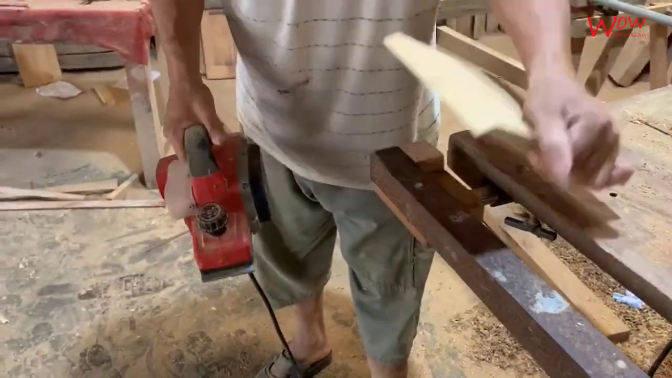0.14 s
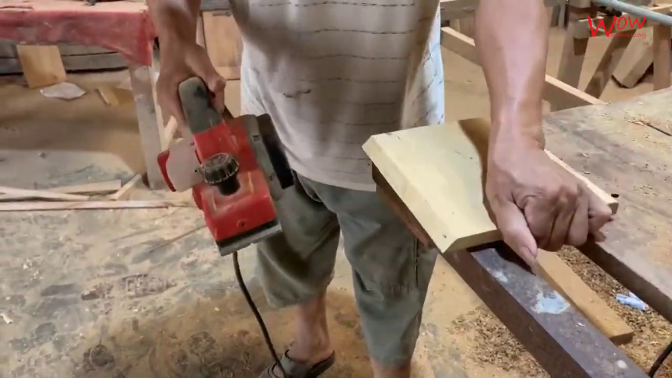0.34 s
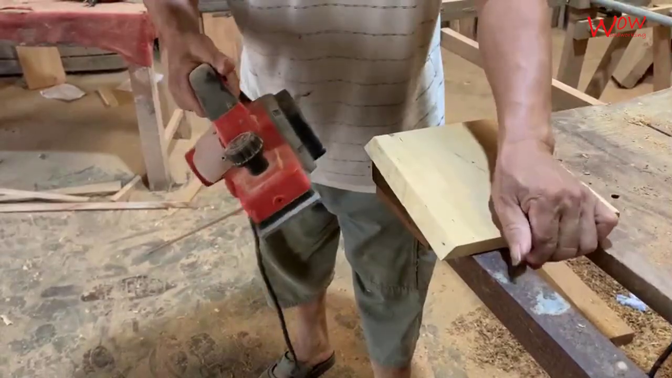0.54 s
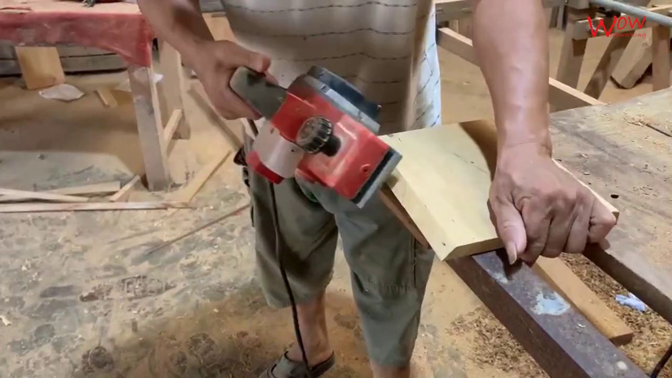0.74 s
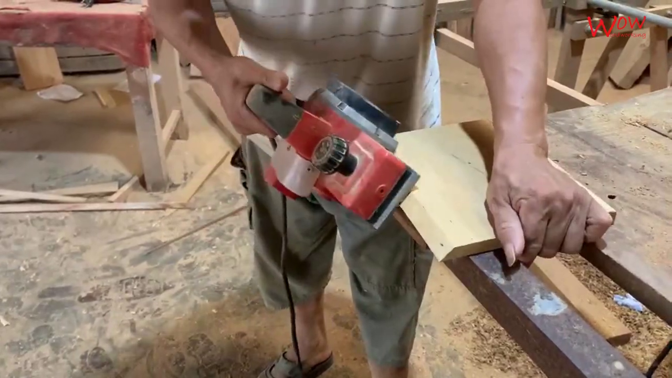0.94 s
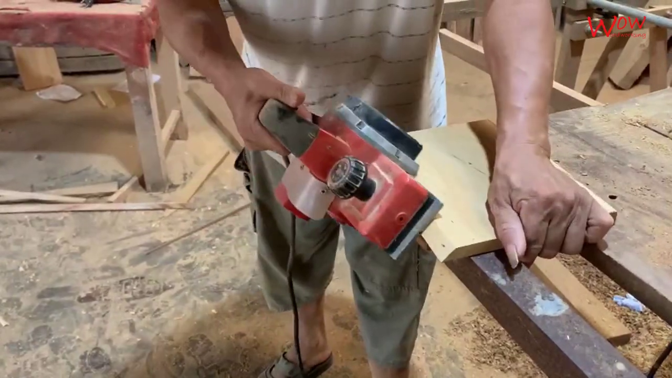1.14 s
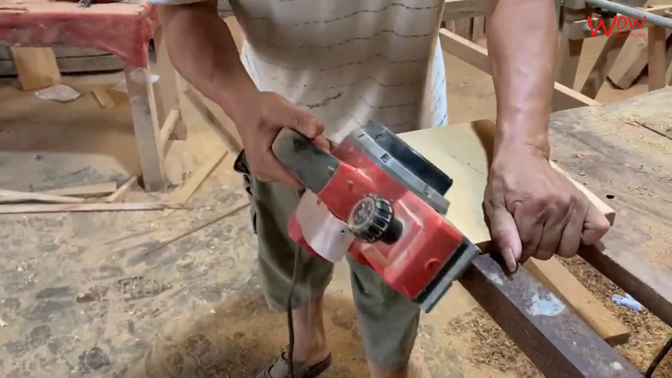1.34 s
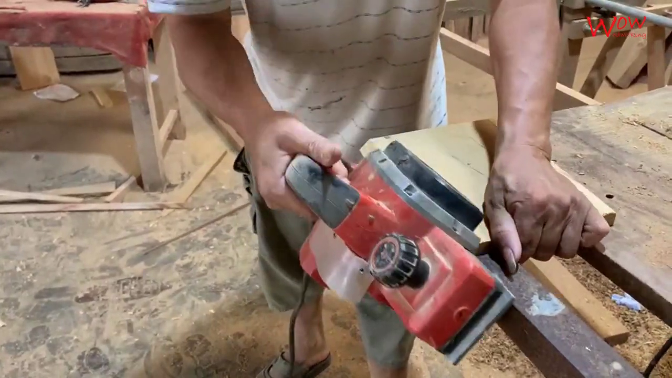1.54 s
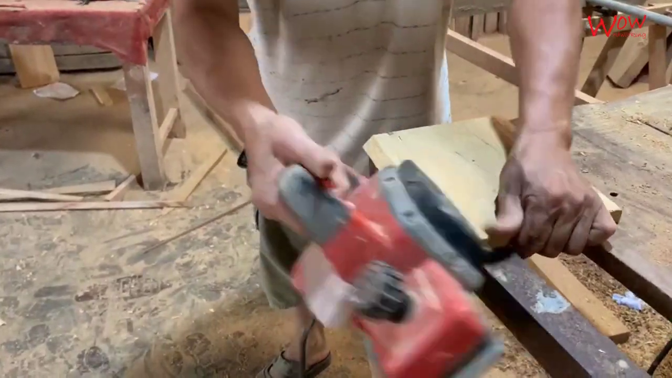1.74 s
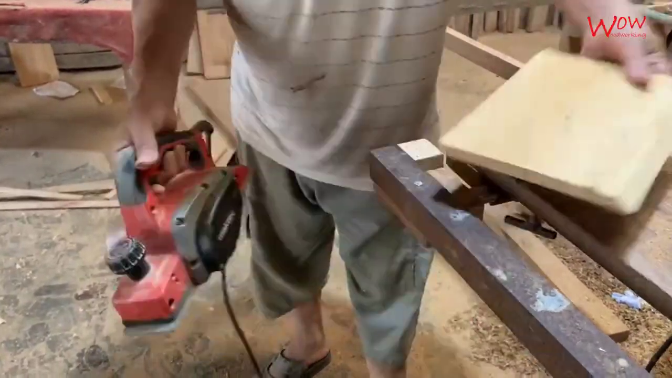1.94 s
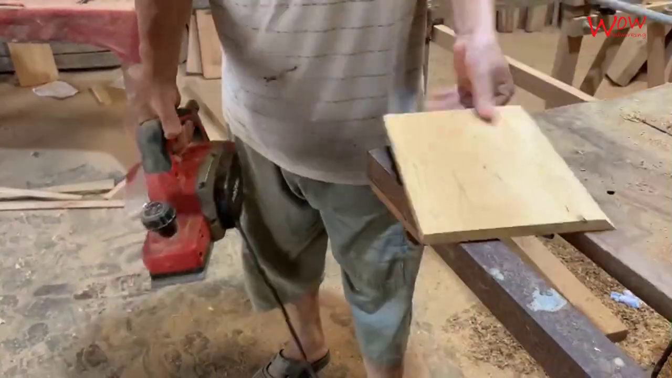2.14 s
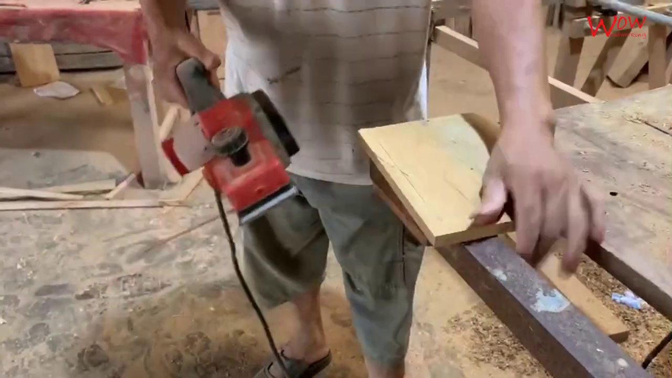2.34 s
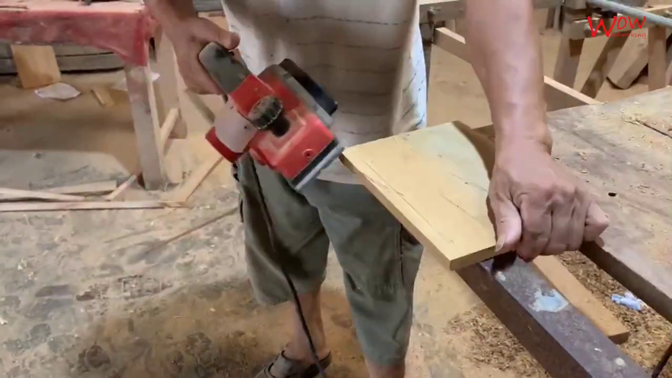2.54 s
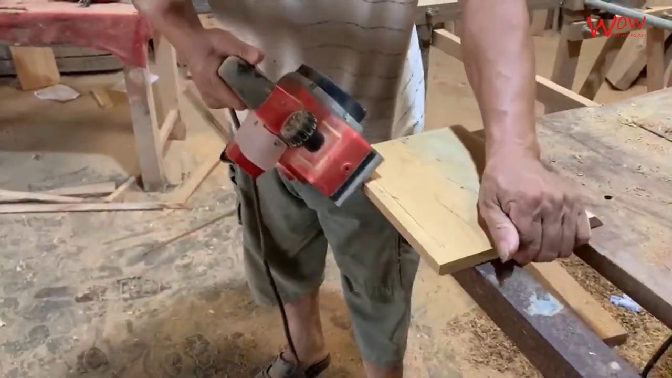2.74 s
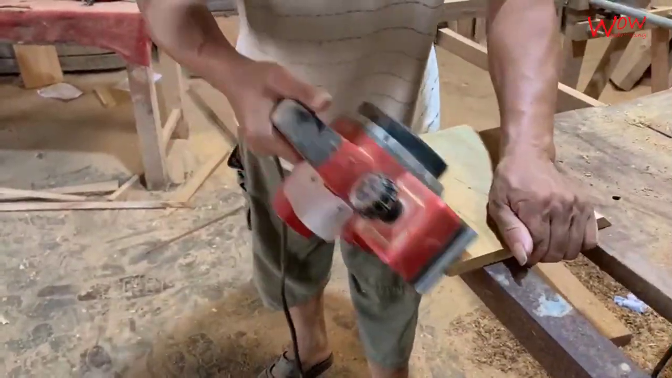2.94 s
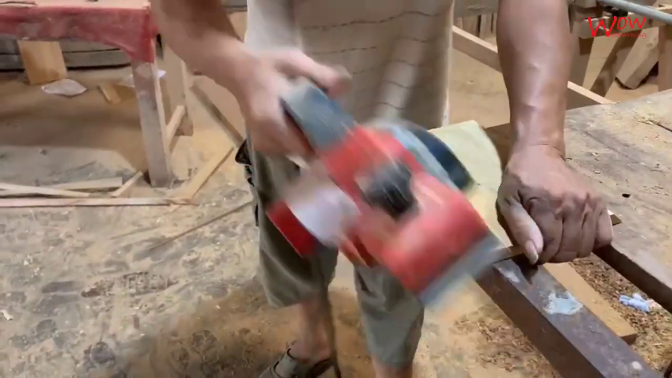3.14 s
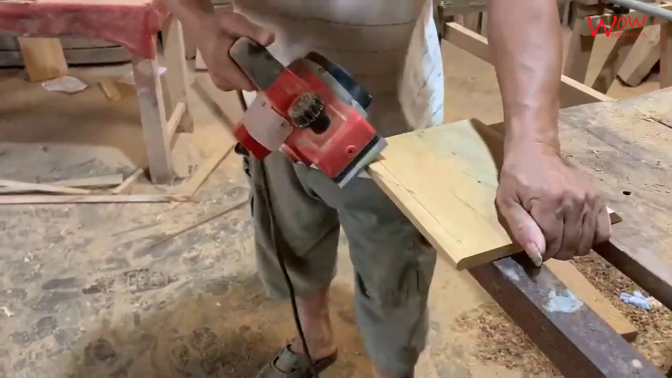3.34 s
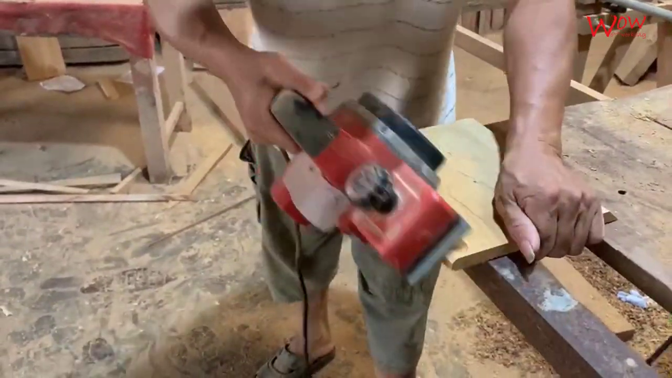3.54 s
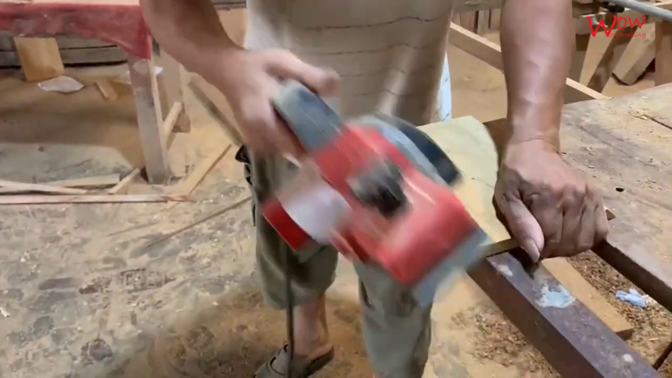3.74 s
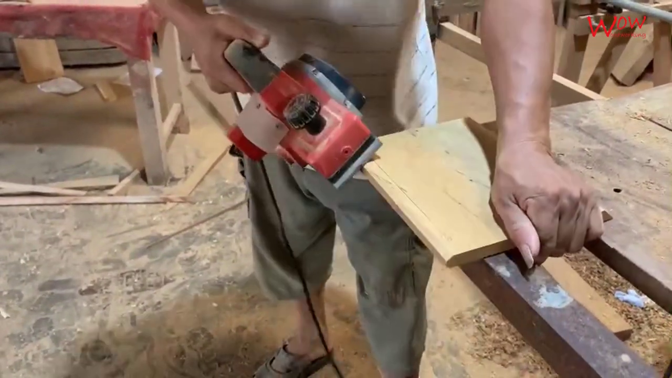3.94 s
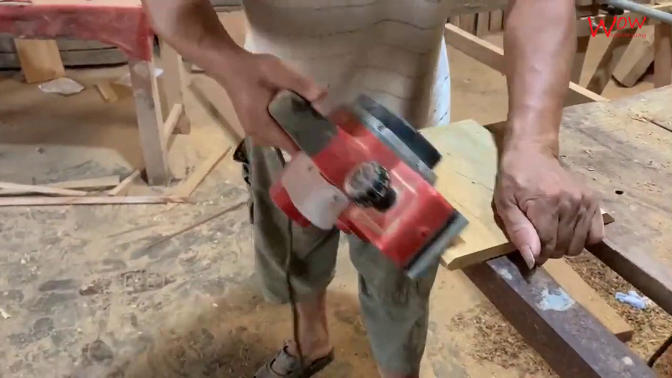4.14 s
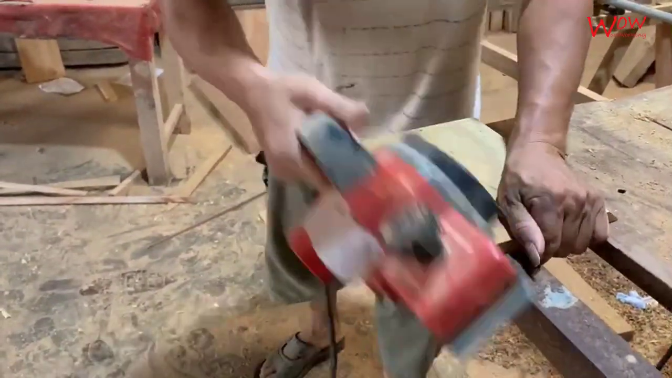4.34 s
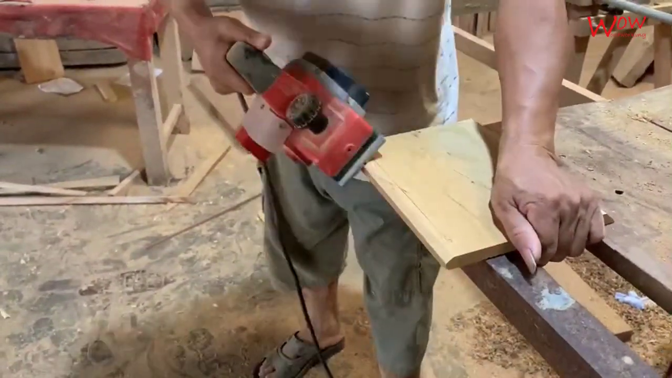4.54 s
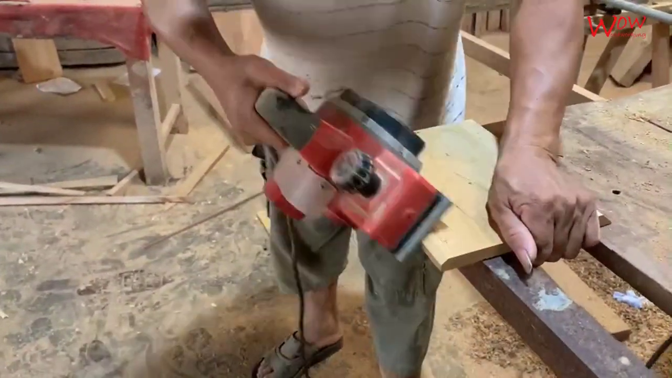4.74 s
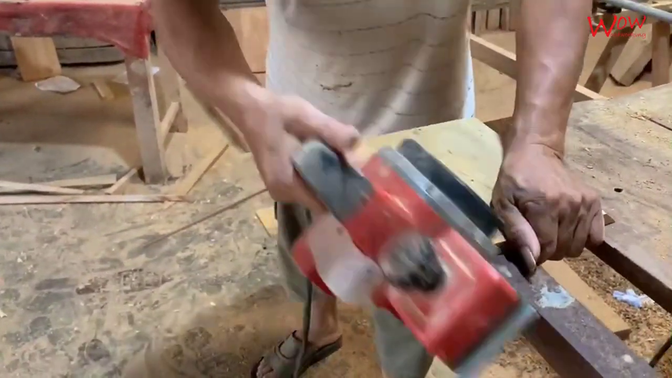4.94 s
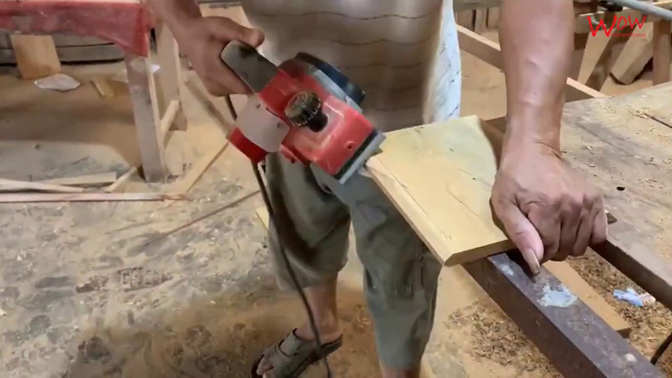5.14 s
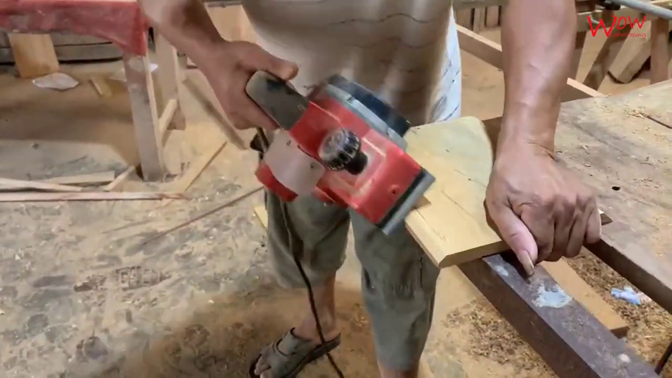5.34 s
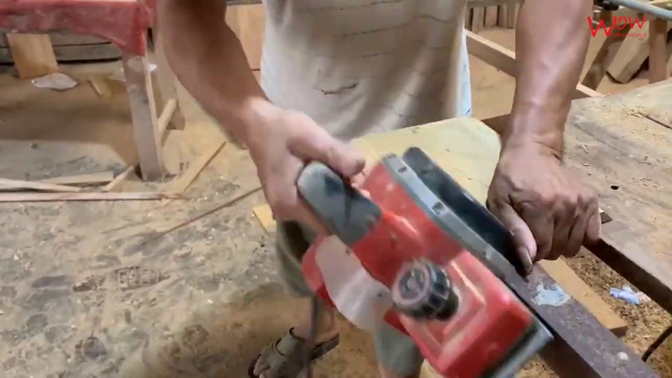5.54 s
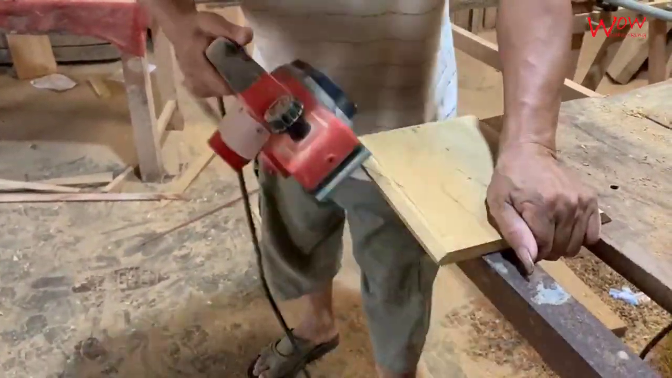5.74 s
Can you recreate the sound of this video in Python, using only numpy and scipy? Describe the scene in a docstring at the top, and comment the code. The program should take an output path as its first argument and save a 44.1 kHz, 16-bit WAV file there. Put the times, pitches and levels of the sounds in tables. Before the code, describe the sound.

An electric hand planer screams through one long pass, winds down while a board clatters onto the bench, then makes five short shrieking passes.

```python
"""In a dull workshop a board slides into place, then an electric hand planer spins up for one long pass.
It coasts while the board is turned over and clatters onto the bench, then starts again for five short
passes, each dragging its speed down. The rotor's speed follows from motor pull, friction and drag of the wood.
Blade harmonics make the pitched scream, noise the torn fibres and fan rush; a microphone pair hears it all."""
import sys
import numpy as np
from scipy import signal
from scipy.fft import rfft, irfft, next_fast_len
from scipy.io import wavfile
from scipy.ndimage import uniform_filter1d, map_coordinates

SR = 44100
rng = np.random.default_rng(int(sys.argv[2]) if len(sys.argv) > 2 else 0)


def materialize(psi):
    """Save the field psi as 16-bit PCM at rate SR to the path in sys.argv[1].

    A 1-D psi becomes a single channel; in a 2-D psi each row is a channel.
    """
    bounded = np.clip(np.atleast_2d(psi).T, -1, 1)
    quanta = np.round(bounded * 32767).astype(np.int16)
    wavfile.write(sys.argv[1], SR, quanta)


N = 255780  # length in samples


def amp(db):
    """Decibels to gain."""
    return np.exp(np.asarray(db) * (np.log(10) / 20))


def unit(x):
    """Scale to rms 1."""
    return x / np.sqrt(np.mean(x ** 2) + 1e-20)


def along(points, hz):
    """Read (Hz, value) points on a log frequency axis."""
    f, v = np.transpose(points)
    return np.interp(np.log(hz + 1), np.log(f + 1), v)


def bell(hz, centre, width):
    """The shape of a resonance, 1 at its centre."""
    return 1 / (1 + (2 * (hz - centre) / width) ** 2)


def hump(t, centre, half):
    """A smooth swell, 1 at its centre."""
    return np.exp(-((t - centre) / half) ** 2)


def progress(t, start, end):
    """0 before start, rising to 1 at end."""
    return np.clip((t - start) / (end - start), 0, 1)


def wobble(rate, size):
    """A smooth random curve, rate knots a second."""
    fine = 8  # spline points per knot
    knots = rng.standard_normal(int(size * rate / SR) + 4)
    positions = np.arange((len(knots) - 1) * fine) / fine
    smooth = map_coordinates(knots, [positions], order=2)
    return np.interp(np.arange(size) * (fine * rate / SR), np.arange(len(smooth)), smooth)


def jumps(rate, size):
    """A random level that holds, then slips to a new value about rate times a second."""
    held = rng.standard_normal(size)[np.cumsum(rng.random(size) < rate / SR)]
    return uniform_filter1d(uniform_filter1d(held, size=300), size=200)


def filtered(x, response):
    """Shape x by a response of frequency."""
    size = x.shape[-1]
    m = next_fast_len(size + 8192)
    return irfft(rfft(x, m) * response(np.fft.rfftfreq(m, 1 / SR)), m)[..., :size]


def noise(spectrum, size):
    """Coloured noise of rms 1."""
    return unit(filtered(rng.standard_normal(size), lambda hz: amp(along(spectrum, hz))))


# Colour of the quiet workshop. Each row: frequency in Hz, relative level in dB.
ROOM_TONE = [(15, -67), (25, -37), (91, -2), (113, -0.5), (260, -1.5), (297, -1), (421, -7.5),
             (1380, -13.5), (1950, -12), (5580, -12), (9050, -17), (12500, -13), (15500, -12.5)]


def background(t, floor_db=-74.0, rub_db=-72):
    """Quiet room tone, and a swell of noise as the board slides into place under the hand."""
    rub = noise([(200, -17), (900, -5), (4000, -5), (14000, -9)], N) * hump(t, .14, 0.055)
    return amp(floor_db) * noise(ROOM_TONE, N) + amp(rub_db) * rub


# Decay of the workshop before shrinking. Each row: frequency in Hz, time to fall 60 dB in seconds.
WORKSHOP_DECAY = [(200, 0.15), (2000, 0.37), (12000, 0.17)]


def reflections(x, shrink):
    """Sound off the surroundings: a diffuse noise tail of energy 1, its decay times divided by shrink."""
    hz, t, z = signal.stft(rng.standard_normal(SR // 3), SR, nperseg=256)
    decay = amp(-60 * t * shrink / along(WORKSHOP_DECAY, hz)[:, None])
    tail = signal.istft(z * decay, SR, nperseg=256)[1]
    return signal.fftconvolve(x, tail / np.linalg.norm(tail))[:N]


CHATTER_START_S, CHATTER_S, CHATTER_GAP_S = 2.3055, .044, .0028  # start, length, nominal time between contacts
CHATTER_DB, CHATTER_FADE_DB, CHATTER_HARD_HZ = -1.7, 3, 12500  # relative force, its fall, contact cut-off


def clatter(scatter=.2, uneven_db=1.05):
    """The landing board's quick, uneven contacts, as rows like those of the knocks."""
    rows = []
    for delay in np.arange(0, CHATTER_S, CHATTER_GAP_S):
        late, loud = rng.standard_normal(2)
        s = CHATTER_START_S + delay + scatter * CHATTER_GAP_S * late
        force_db = CHATTER_DB - CHATTER_FADE_DB * delay / CHATTER_S + uneven_db * loud
        rows.append((s, force_db, CHATTER_HARD_HZ))
    return rows


# Single touches of the board on the bench.
# Each row: start in seconds, relative force in dB, hardness of contact as a cut-off in Hz.
KNOCKS = [(2.123, -21, 400), (2.246, -26.5, 2980), (2.255, -25, 2000), (2.271, -27, 2500),
          (2.3013, -9, 7000), (2.355, -14, 300), (2.362, -22, 3500)]
# The board's modes. Each row: frequency in Hz, relative level in dB, time to fall 60 dB in seconds.
BOARD_MODES = [(189, -14.5, 0.045), (317, -7.5, 0.046), (612, -2.5, 0.035), (1070, -0.5, 0.013),
               (1190, 0.5, 0.027), (1477, -0.5, 0.022), (1826, 5.5, 0.031), (1910, 0, 0.023),
               (2440, 5, 0.03), (3050, -4, 0.029), (3520, -1.5, 0.014), (4830, -1, 0.013),
               (6530, -4.5, 0.035)]


def board(knock_db=-32, crack_db=6, crack_t60=0.021):
    """The board chatters on the bench; each touch cracks and rings modes that the hand damps quickly."""
    out, t = np.zeros(N), np.arange(SR // 10) / SR
    crack_colour = [(40, -27), (150, -3.5), (2500, -14), (4000, -5.5), (9000, -7.0), (15000, -5)]
    onset = 1 - np.exp(-t / 0.00047)
    for s, db, hard_hz in KNOCKS + clatter():
        ring = np.zeros(len(t))
        for hz, level, t60 in BOARD_MODES:
            decay = amp(level + rng.normal(0, 1.8) - 60 * t / t60)
            ring += decay * np.sin(2 * np.pi * hz * t + rng.uniform(0, 2 * np.pi))
        crack = noise(crack_colour, len(t)) * amp(crack_db - 60 * t / crack_t60)
        soften = signal.butter(2, min(hard_hz, SR / 3), fs=SR, output="sos")
        touch = signal.sosfilt(soften, (ring + crack) * onset)
        out[round(s * SR):][:len(t)] += amp(db + knock_db) * touch
    # a small board radiates no deep bass
    return signal.sosfilt(signal.butter(3, 120, "highpass", fs=SR, output="sos"), out)


def trigger(t, start=.621, snap_db=-50, life=0.024):
    """The switch closes and the brushes spit a short burst of noise as the rotor jerks into motion."""
    spit_colour = [(300, -25), (2300, -23), (3000, 10), (3800, -12), (10000, -29), (13500, 6.5), (15500, -6)]
    rise = progress(t, start, start + 0.0049)
    return amp(snap_db) * noise(spit_colour, N) * rise * np.exp(-np.abs(t - start) / life)


# The trigger is squeezed for a pass or more, then let go.
# Each row: on in seconds, off in seconds, share of full torque.
SQUEEZES = [(.62, 1.798, 1), (2.521, 3.139, .998), (3.241, 3.757, .942), (3.847, 5.9, .945)]
# Passes along the board, also heard in planing(). Each row: start and end in seconds,
# drag at entry and at exit in turns/s per s, bite at entry in dB, its swell by the end in dB,
# growl and edge relative to the bite in dB, noisy share from 0 to 1.
PASSES = [(1.064, 1.72, 177.3, 425.4, -42, 1.5, -9, -.5, 0.01),
          (2.83, 3.13, 99.8, 338.8, -58.5, 10.5, -3, -2.5, 0.029),
          (3.487, 3.736, 239, 441, -46, -0.5, -2, -1, 0.046),
          (4.088, 4.335, 381, 589.8, -47.5, 3, -5, -1, 0.088),
          (4.698, 4.971, 583.3, 316.2, -45, 2, -2.5, 0.5, 0.068),
          (5.322, 5.598, 754, 192, -43, 2.5, -6, 0, 0.081)]
# Once in each pass the blades dig deeper, also heard in planing(). Each row: centre in seconds,
# half length in seconds, extra drag in turns/s per s, lift in dB, extra growl in dB, extra noisy share 0-1.
DIGS = [(1.4, 0.096, 374, 1.5, 9.5, 0.03), (3.1, 0.026, 378, 12.5, 0.5, 0.1),
        (3.691, .028, 147, 13.5, 3, 0.17), (4.294, 0.032, 2.12, 7, 2.5, 0.21),
        (4.89, .06, 349, 2.5, 1, 0.17), (5.51, .06, 536, 2.5, 6, 0.07)]
# Series motor: pull at standstill (turns/s per s), speed where it has halved (turns/s), friction (1/s)
STALL_PULL, KNEE_SPEED, FRICTION = 35235, 68.8, .849


def rotation(t, flutter=.0012):
    """Cutter speed and angle: the motor pulls, friction and wood hold back, the belt flutters."""
    step, switch_s = .002, .004
    ticks = np.arange(0, t[-1] + step, step)
    torque, drag = np.zeros(len(ticks)), np.zeros(len(ticks))
    for on, off, share in SQUEEZES:
        torque += share * np.clip(np.minimum(ticks - on, off - ticks) / switch_s, 0, 1)
    for (start, end, drag_in, drag_out, *_), (s, half, extra, *_) in zip(PASSES, DIGS):
        in_wood = (ticks > start) * (ticks < end)
        drag += in_wood * (np.interp(ticks, [start, end], [drag_in, drag_out]) + extra * hump(ticks, s, half))
    turns, history = 0, []
    for share, load in zip(torque.tolist(), drag.tolist()):
        pull = share * STALL_PULL / (1 + (turns / KNEE_SPEED) ** 2)
        turns += step * (pull - FRICTION * turns - load)
        history.append(max(turns, 1))
    speed = np.interp(t, ticks, history) * (1 + flutter * wobble(60, N))
    return speed, 2 * np.pi * np.cumsum(speed) / SR


# Blade harmonics running in air. Each row: frequency in Hz, relative level in dB.
FREE_COLOUR = [(400, -15), (700, -15.5), (1000, -12.5), (1900, 0.5), (2900, -.5), (3900, -3), (4900, -4),
               (5900, -24)]
CRUISE_SPEED = 445  # turns/s


def blade_hum(speed, angle, odd_db=-16, sway_db=4.0, fade_db=3):
    """Two blades beat the air: even multiples are strong, odd ones come from imbalance."""
    hum = np.zeros(N)
    for k in range(1, 13):
        level = along(FREE_COLOUR, k * speed) + odd_db * (k % 2) - fade_db * max(k - 8, 0)
        level = level + sway_db * wobble(14, N)
        hum += amp(level) * np.sin(k * angle + rng.uniform(0, 2 * np.pi))
    return unit(hum)


# Colours of fan rush, draught and rumble. Each row: frequency in Hz, relative level in dB.
AIR = [(710, -36), (1200, -17.5), (1460, 0.5), (1590, -2.5), (1820, 3.5), (2410, 1), (2620, 3.5),
       (3080, -3.5), (4770, -5), (6170, -8.5), (9570, -9.5), (13600, -20.5), (15500, -23)]
DRAUGHT = [(150, -36), (330, -25), (480, -11.5), (745, -10.5), (850, -5), (1000, 0.5), (1220, -4.5),
           (1450, -6), (1700, -10.5), (2300, -27), (3700, -60)]
RUMBLE = [(25, -45), (60, -15), (110, -2.5), (170, 1.5), (260, -7), (400, -8.5), (900, -9.5), (2500, -60)]
# On the way back the exhaust swings past the microphone.
# Each row: centre in seconds, lift of the draught in dB.
SWINGS = [(1.95, 4), (3.34, 3), (3.82, 4), (4.49, 10.5), (5.11, 6.5), (5.72, 3.5)]
SWING_S, SWING_AIR_SHARE = 0.07, 0.32  # half length; part of the lift that the fan's rush shares
# Base levels at cruising speed or faster, and their fall per decade of speed below it
MOTOR_DB, MOTOR_DB_PER_DECADE = -50.5, 107
DRAUGHT_DB, DRAUGHT_DB_PER_DECADE = -65.5, 55
INRUSH_DB, INRUSH_S = -55, 0.049  # the whine under the starting current, and its decay constant


def machine(t, speed, angle, tone_db=-3.0, air_db=-4, rumble_db=-79, whine_db=-65.5, unsteady_db=0.52):
    """Blades beat the air, the fan rushes and the geared-up motor whines; running sound fades with speed."""
    pace = np.minimum(speed / CRUISE_SPEED, 1)
    swing_db = sum(db * hump(t, s, SWING_S) for s, db in SWINGS)
    motor_db = MOTOR_DB + MOTOR_DB_PER_DECADE * np.log10(pace) + unsteady_db * wobble(12, N)
    draught_db = DRAUGHT_DB + DRAUGHT_DB_PER_DECADE * np.log10(pace) + swing_db + 1.3 * wobble(20, N)
    air = noise(AIR, N) * (1 + 0.13 * np.cos(2 * angle))
    air *= amp(1.36 * wobble(45, N) + SWING_AIR_SHARE * swing_db)
    motor = amp(motor_db) * (amp(tone_db) * pace ** 3.0 * blade_hum(speed, angle) + amp(air_db) * air)
    # the whine sounds at 21.36 times the cutter's turning
    whine = np.sin(21.36 * angle + 1.3 * wobble(300, N)) * amp(3 * wobble(45, N))
    # the slower the rotor is when the trigger closes, the more current it draws: it sings and the brushes hiss
    inrush = np.zeros(N)
    for on, _, _ in SQUEEZES:
        shortfall = abs(1 - np.interp(on, t, pace))
        inrush += shortfall * progress(t, on, on + 0.024) * np.exp(-np.abs(t - on) / INRUSH_S)
    start = amp(INRUSH_DB) * (inrush * whine + 0.38 * np.sqrt(inrush) * air)
    draught = amp(draught_db) * noise(DRAUGHT, N)
    rumble = amp(rumble_db) * pace * noise(RUMBLE, N)
    return motor + start + amp(whine_db) * pace ** 3 * whine + draught + rumble


def zones(hz):
    """Shares of a frequency in the growl, bite and edge ranges."""
    above_growl, above_bite = progress(hz, 3150, 3450), progress(hz, 5850, 6150)
    return np.array([1 - above_growl, above_growl - above_bite, above_bite])


# Blade harmonics in wood. Each row: frequency in Hz, relative level in dB.
CUT_COLOUR = [(450, -12.5), (900, -9.5), (1060, -9.5), (1900, 0.5), (2900, 3.5), (4000, 4), (5000, 5),
              (6200, 1), (8000, 7.5), (10000, 1), (12500, -3.5), (15500, -8)]
# Resonances of sole plate and board that the harmonics sweep through.
# Each row: frequency in Hz, width in Hz, lift in dB.
PLATE = [(808, 170, 8), (1750, 320, 5), (2640, 140, 9.5), (3574, 210, 5), (4070, 55, 11.5), (4830, 82, 1.5),
         (5040, 130, 9), (5450, 54, 11.5), (6360, 40, 12), (7250, 54, 11), (8024, 87, 6)]
# Plate or board briefly sings along with the blade harmonics nearby.
# Each row: centre in seconds, half length in seconds, frequency in Hz, lift in dB.
SQUEALS = [(1.18, 0.052, 4065, 6), (1.224, 0.1, 5100, 7.5), (1.298, 0.026, 4990, 8),
           (1.323, 0.021, 1920, 7.5), (1.445, .025, 8100, 13), (1.508, .022, 5320, 11),
           (1.552, 0.068, 2670, 12), (1.597, 0.032, 5400, 16.5), (2.88, 0.022, 4890, 10.5),
           (2.99, 0.054, 3975, 10.5), (3.581, 0.014, 3970, 13.5), (3.7, .008, 4700, 14.5),
           (4.16, 0.017, 3910, 5), (4.284, 0.014, 2787, 9.5), (4.31, 0.017, 5400, 12.5),
           (4.712, 0.018, 3117, 9), (4.793, 0.017, 3915, 16), (4.86, .014, 4660, 13.5),
           (4.913, 0.026, 1830, 9.5), (4.955, 0.015, 5310, 12), (5.477, 0.031, 1820, 10.5),
           (5.576, 0.015, 5145, 13.5)]
SQUEAL_WIDTH_HZ = 780


def blade_strikes(t, start, end, speed, strike, rough, odd_db=-15, clean_sway_db=4.0, torn_sway_db=10):
    """Regular strikes ring plate and board: harmonics in three ranges, evened out by their nominal power."""
    size = len(t)
    squeals = [(centre, db * hump(t, s, half)) for s, half, centre, db in SQUEALS if start < s < end]
    grid_hz = np.arange(0, SR / 2, 10)
    body_db = along(CUT_COLOUR, grid_hz) + sum(db * bell(grid_hz, centre, width) for centre, width, db in PLATE)
    sway_db, slip = clean_sway_db + torn_sway_db * rough, 2 * rough
    # the two blades cut alike in clean wood; tearing unbalances them and brings out odd multiples
    imbalance_db = odd_db + 9.9 * rough
    tones, power = np.zeros((3, size)), np.zeros((3, size))
    for k in range(1, 37):
        hz = k * speed
        level = np.interp(hz, grid_hz, body_db) + imbalance_db * (k % 2)
        level += sway_db * min(k / 12, 1) * jumps(38, size)
        gain = zones(hz) * amp(level)
        sing = amp(sum(db * bell(hz, centre, SQUEAL_WIDTH_HZ) for centre, db in squeals))
        chatter = 1 + 1.2 * rough * np.tanh(wobble(120, size))
        phase = k * strike + slip * wobble(49.9, size) + rng.uniform(0, 2 * np.pi)
        tones += gain * sing * chatter * np.sin(phase)
        power += gain ** 2 / 2  # without the squeals, so these stand out
    return tones / np.sqrt(power)


# Colour of the torn fibres. Each row: frequency in Hz, relative level in dB.
CHIPS = [(80, -34), (300, -35), (600, -18.5), (1000, -5.5), (1900, -4), (3000, 5), (5000, 13), (6500, 15),
         (8500, 15.5), (12500, 5), (15500, -13)]


def torn_fibres(strike, chop=0.61):
    """Torn fibres spray noise at each blade strike, split into growl, bite and edge of rms 1."""
    size = len(strike)
    spray = rng.standard_normal(size) * (1 + chop * np.cos(2 * strike)) * amp(2.6 * wobble(297.0, size))
    bands = filtered(spray, lambda hz: zones(hz) * amp(along(CHIPS, hz)))
    return np.array([unit(band) for band in bands])


ENTRY_S, EXIT_S = 0.018, 0.022  # the blades take hold and let go


def shave(stroke, dig, t, speed, angle, jitter=0.082, blade_db=0, chip_db=-1.5, grain_db=1.03):
    """One pass: regular blade strikes and torn-fibre noise share the cut; digging deeper adds noise."""
    size = len(t)
    start, end, _, _, entry_db, swell_db, growl_db, edge_db, noisy = stroke
    dig_s, dig_half, _, dig_db, dig_growl_db, dig_noisy = dig
    depth = hump(t, dig_s, dig_half)
    bite_db = entry_db + swell_db * progress(t, start, end) + dig_db * depth
    zone_db = (growl_db + dig_growl_db * depth, 0, edge_db)
    force = amp([bite_db + db + grain_db * wobble(34.8, size) for db in zone_db])
    tear = np.clip(noisy + dig_noisy * depth, 0, 1)
    rough = np.sqrt(tear)
    # uneven grain shifts the moment of each strike and throws energy between the harmonics
    strike = angle + jitter * rough * wobble(171.7, size)
    tones = blade_strikes(t, start, end, speed, strike, rough)
    chips = torn_fibres(strike)
    cut = amp(blade_db) * np.sqrt(1 - tear) * tones + amp(chip_db) * rough * chips
    bounce = 1 + .6 * rough * np.tanh(wobble(110, size))
    contact = progress(t, start, start + ENTRY_S) * (1 - progress(t, end - EXIT_S, end))
    return contact * bounce * np.sum(force * cut, axis=0)


def planing(t, speed, angle):
    """All passes along the board, each cut at the rotor's own speed and angle."""
    out = np.zeros(N)
    for stroke, dig in zip(PASSES, DIGS):
        span = (t > stroke[0]) & (t < stroke[1])
        out[span] += shave(stroke, dig, t[span], speed[span], angle[span])
    return out


def drifting(x, spread):
    """Difference between two ports: a quarter cycle late, swinging in patches as the paths change."""
    z = signal.stft(x, nperseg=512)[2]
    field = uniform_filter1d(rng.standard_normal(z.shape), size=6, axis=0)
    field = uniform_filter1d(field, size=16, axis=1)
    return signal.istft(-1j * z * (1 + spread * unit(field)), nperseg=512)[1][:N]


# Response of the microphone pair's side signal. Each row: frequency in Hz, gain in dB.
WIDTH = [(900, -61), (1600, -85), (2100, -15.5), (2600, -3), (5000, -0.5), (10000, 1), (15000, 1.5)]


def scene(room_db=-18, direct_db=-5, scatter_db=-9):
    """The sources in the workshop, at a microphone pair that is mono in the bass."""
    t = np.arange(N) / SR
    speed, angle = rotation(t)
    tool = machine(t, speed, angle) + trigger(t) + planing(t, speed, angle)
    dry = tool + board() + background(t)
    mid = dry + amp(room_db) * reflections(tool, shrink=0.6)
    # sound reaches the right port first; near surfaces scatter the rest
    direct = amp(direct_db) * drifting(dry, spread=0.85)
    scattered = amp(scatter_db) * reflections(dry, shrink=3.2)
    side = filtered(direct + scattered, lambda hz: amp(along(WIDTH, hz)))
    return np.array([mid + side, mid - side])


TOP_HZ = 15850


def record(dry):
    """Nothing is kept above the band limit."""
    return filtered(dry, lambda hz: hz < TOP_HZ)


dry = scene()
out = record(dry)
materialize(out)
```